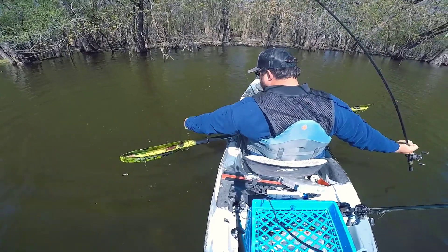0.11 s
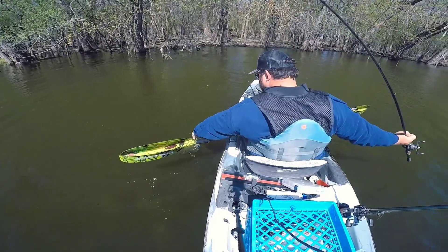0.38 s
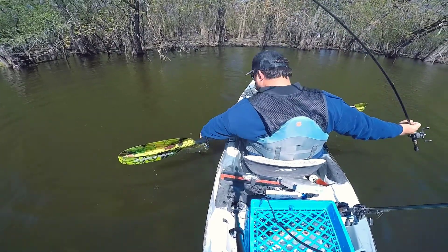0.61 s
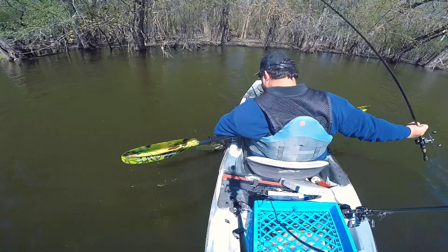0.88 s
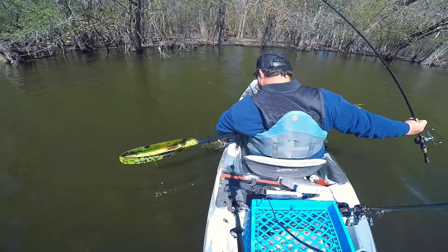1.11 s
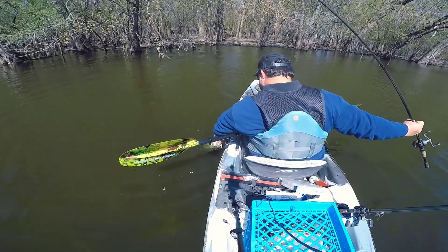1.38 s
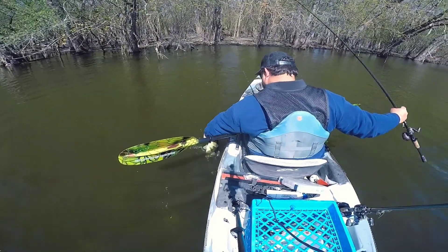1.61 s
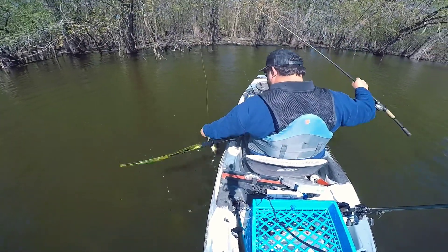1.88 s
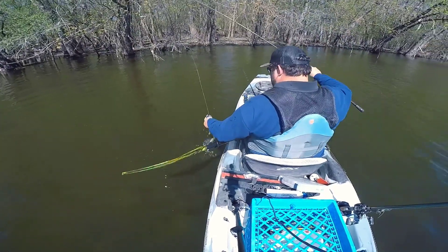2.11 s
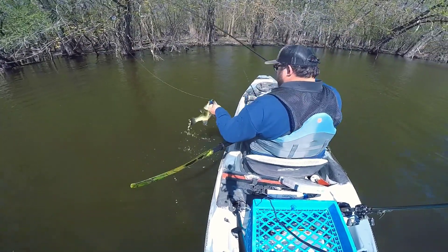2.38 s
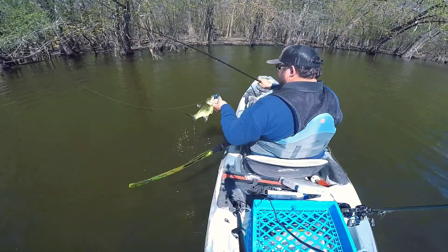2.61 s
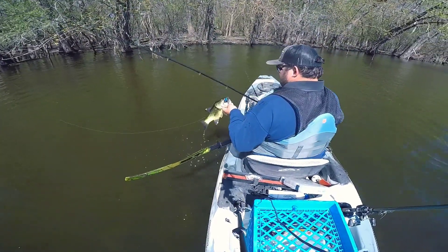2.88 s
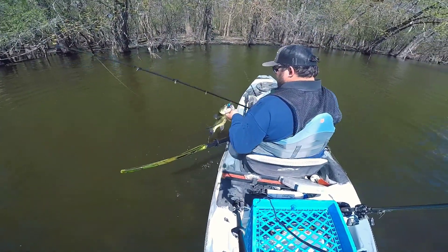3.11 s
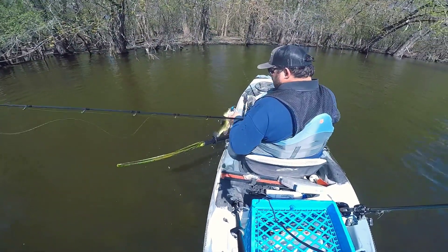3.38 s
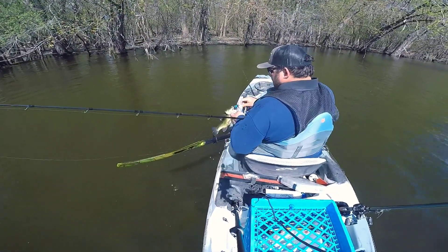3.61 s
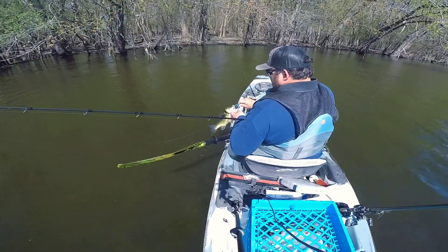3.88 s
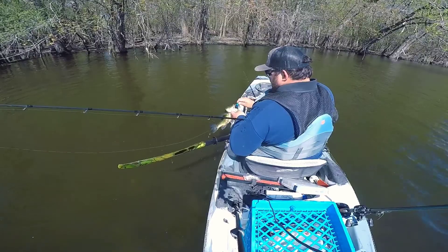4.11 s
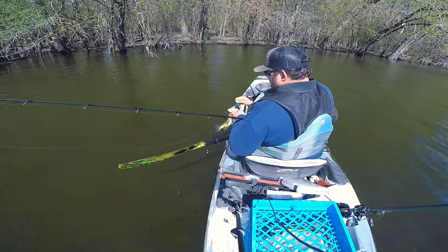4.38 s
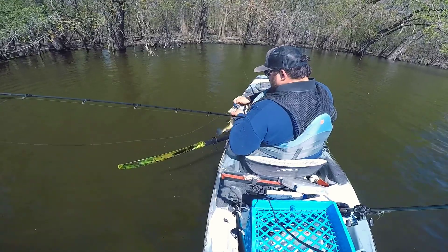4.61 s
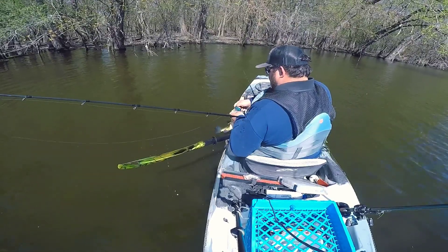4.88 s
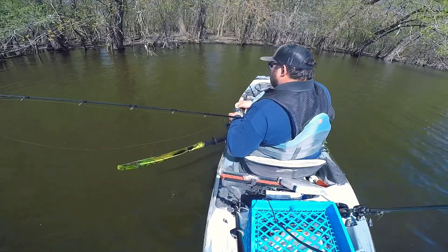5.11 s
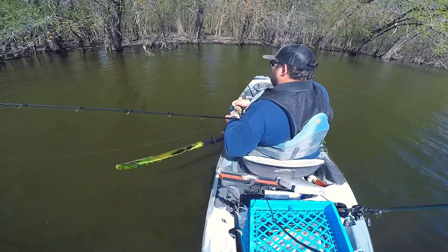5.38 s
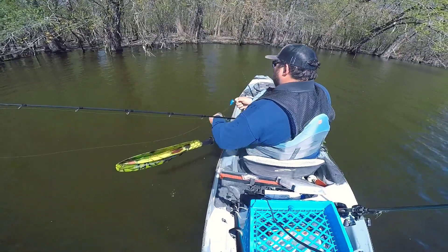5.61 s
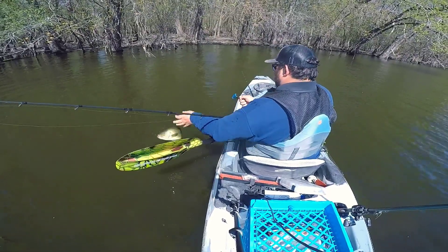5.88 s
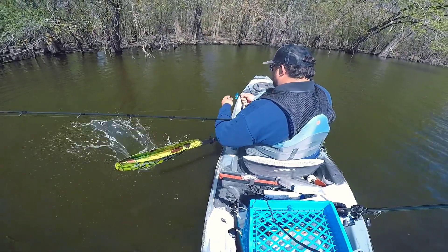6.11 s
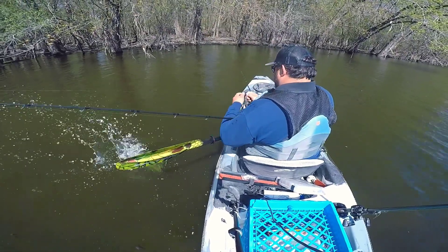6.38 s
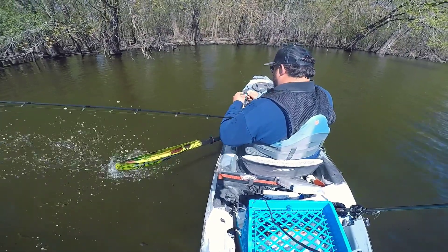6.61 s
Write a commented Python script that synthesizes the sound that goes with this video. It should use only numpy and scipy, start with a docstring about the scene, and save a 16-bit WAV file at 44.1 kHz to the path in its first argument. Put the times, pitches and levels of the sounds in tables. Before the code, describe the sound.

A microphone mounted on a kayak catches deep, irregular wind thumps and faint hiss. After a quiet start, hull bumps and bright drips cluster around two seconds, then a few bubble plops. The reel whirs faintly and ticks as line is pulled. After more sparse ticks, a sudden close splash slaps, gurgles and scatters spray, with droplets falling until the end.

```python
"""Wind gusts thump the microphone over a soft murmur; dull knocks and wet ticks come through.
Blows by rod and paddle ring a plastic kayak hull, drops tick and plop as bubbles, and
a pawl on ratchet teeth makes the reel's drag buzz and click as line is pulled, with a faint gliding tone.
Near the end a small fish goes back with a splash: noise and damped wavelets as slosh and spray."""
import sys
import numpy as np
from scipy import signal
from scipy.fft import rfft, irfft, next_fast_len
from scipy.io import wavfile
from scipy.ndimage import uniform_filter1d, map_coordinates

SR = 44100
rng = np.random.default_rng(int(sys.argv[2]) if len(sys.argv) > 2 else 0)


def boost_factor(decibels):
    """Convert a level in decibels to a linear amplitude factor."""
    exponent = np.asarray(decibels, float) / 20
    return 10 ** exponent


def to_wav(s):
    """Save 16-bit WAV."""
    ch = np.atleast_2d(s).T  # columns
    pcm = np.round(np.clip(ch, -1, 1) * 32767)  # PCM
    wavfile.write(sys.argv[1], SR, pcm.astype(np.int16))


N = 297231  # length in samples

# Levels are relative: later gains and filters still act on them.
# the fish slaps the surface: [start_s, spray_level_db, slosh_level_db, loss_db per 10 ms]
SLAPS = [(5.912, -40.5, -45, 4), (5.95, -42, -70, 3.5), (5.98, -61.5, -44.5, 12.5),
         (6.05, -52.5, -49.5, 0.5), (6.104, -27.5, -32.5, 16), (6.35, -59, -48.5, 4.5),
         (6.44, -49.5, -73, 2.5), (6.5, -48.5, -51, 0.5), (6.699, -59.5, -47, 12)]
SLAP_RISE_DB_PER_S = 898
# thrown water falls back: [time_s, spray_level_db]
FALLING_WATER = [(5.9, -59.5), (6.02, -57), (6.08, -46), (6.13, -56), (6.19, -59), (6.25, -54.5),
                 (6.47, -48.5), (6.58, -70), (6.65, -63.5), (6.74, -56)]
FALLING_SLOSH_DB = -13.5  # slosh against spray as the water falls back
# colour of spray and of stirred droplets: [frequency_hz, level_db]
SPRAY_COLOUR = [(120, -31.5), (200, -17.5), (288, -12), (358, -29), (414, -33.5), (544, 2.5), (1780, -1),
                (1910, -1), (5910, -10.5), (13900, -13), (15500, -12)]

# trapped air pockets with sweeping pitch; the faint rising glide at 3.69 s is the reel speeding up:
# [start_s, length_ms, start_pitch_hz, end_pitch_hz, level_db]
BUBBLES_AND_REEL_GLIDE = [(.543, 5.34, 2915, 2994, -47.5), (1.994, 9.31, 1212, 1251, -56.5),
                          (1.205, 7.555, 1882, 1949, -60), (1.483, 12.534, 574.4, 720, -46),
                          (1.497, 38.03, 518.1, 1050, -54.5), (1.525, 45.62, 533.2, 1450, -55),
                          (1.847, 13.184, 1130, 2200, -43), (3.046, 55.28, 554.6, 1208, -49.5),
                          (3.127, 18.62, 758.6, 1650, -43), (3.209, 9.824, 1896, 2001, -52.5),
                          (3.69, 45, 2690, 4700, -67), (4.785, 6.02, 3240, 2900, -51.5),
                          (5.681, 10.3, 1285, 1320, -58.5), (5.945, 6.59, 2550, 2962, -30),
                          (5.96, 6.95, 701.1, 848, -40), (5.966, 8.494, 515.2, 598.9, -39),
                          (5.977, 11.9, 544, 799.3, -34.5), (6.032, 13.58, 361.9, 419.3, -38.5),
                          (6.044, 13.07, 490.1, 756.4, -40), (6.057, 8.91, 2822, 2950, -35),
                          (6.097, 13.554, 1183, 1149, -27.5), (6.118, 9, 2014, 1940, -36),
                          (5.91, 3.487, 1141, 1265, -32.5), (5.934, 5.35, 1147, 1200, -40.5),
                          (5.996, 10.52, 495.3, 517, -43), (6.039, 15, 1419, 1457, -49),
                          (6.053, 13.29, 421.1, 400.5, -38.5), (6.111, 22.76, 542.7, 539.5, -45.5),
                          (6.192, 29.31, 1005, 698.8, -45.5), (6.225, 29.6, 1651, 1475, -52),
                          (6.344, 5.09, 697.7, 791.3, -50), (6.346, 6.416, 1129, 1177, -43.5),
                          (6.433, 6.975, 966.3, 1114, -43), (6.448, 6.93, 1282, 1398, -44.5),
                          (6.531, 15.47, 550.1, 561.8, -48.5), (6.605, 9, 747, 771, -48),
                          (6.499, 8.845, 1773, 1803, -42.5), (6.703, 43.65, 370.9, 478, -45.5)]
SWEEP_FADE_DB, SWELL_DB_PER_OCTAVE = 10.5, 5.5  # lost over the length; won back per octave of climb

# drops, spray and tackle ticking: [start_s, level_db, pitch_hz, relative width in octaves, t60_ms of the hiss]
TICKS = [(0.544, -48, 4805, 1.486, 6.55), (1.381, -56, 3640, 0.111, 11.45),
         (1.3646, -49.5, 10090, 0.882, 1.574), (1.469, -57.5, 3706, 0.3403, 11.9),
         (1.493, -48.5, 7849, 0.353, 11.42), (1.495, -65, 3100, 0.352, 10), (1.5, -53.5, 2400, 0.657, 13.9),
         (1.503, -42.5, 5495, 1.54, 6.08), (1.506, -56, 3505, 0.376, 9.81),
         (1.5215, -44.5, 1296, 0.659, 13.86), (1.546, -53.5, 2695, 0.471, 13.48),
         (1.522, -43, 3078, 0.1604, 8.95), (1.537, -44.5, 4488, 1.443, 26.87),
         (1.8156, -47, 3970, 0.412, 7.39), (1.8745, -42.5, 5809, 0.169, 6.12),
         (1.895, -47, 11950, 0.473, 5.42), (1.9948, -42, 3370, 0.3484, 16.88),
         (2.071, -39, 1922, 8.69, 10.87), (2.119, -49.5, 1700, 0.502, 8.15),
         (2.156, -50.5, 5275, 0.435, 26.76), (2.164, -50.5, 2900, 0.3013, 14.87),
         (2.18, -57.5, 3000, 0.3007, 15), (2.2234, -47, 10060, 2.042, 3.72),
         (2.232, -50, 3677, 0.3045, 18.9), (2.249, -50, 4190, 0.443, 15.28),
         (2.2744, -33, 9435, 1.134, 13.16), (2.286, -44.5, 2572, 0.579, 5.75),
         (2.315, -55.5, 4125, 0.316, 8.07), (2.324, -60, 13200, 0.299, 5.1), (2.372, -55, 8003, 0.2013, 6),
         (2.396, -49, 10500, 0.995, 3.97), (2.398, -55.5, 3654, 0.243, 7.95),
         (2.421, -45, 5502, 0.398, 9.13), (2.425, -55, 8310, 0.1983, 10.13),
         (2.446, -56.5, 8200, 0.2256, 6), (2.447, -51, 2999, 0.3976, 8.34),
         (2.496, -57, 9000, 0.498, 2.994), (2.3436, -50.5, 4284, 0.604, 6.76),
         (2.354, -48, 4429, 0.492, 2.596), (2.365, -38.5, 12500, 0.545, 4), (2.366, -44, 4023, 0.422, 6.89),
         (2.3762, -49.5, 5576, 0.745, 4.23), (2.4055, -42.5, 7296, 0.788, 2),
         (2.4157, -40.5, 7100, 0.554, 2.205), (2.4505, -46.5, 11010, 0.705, 3),
         (2.4669, -27.5, 8684, 3.003, 5.883), (2.4758, -47, 10460, 0.787, 3),
         (2.487, -41.5, 7829, 0.8, 2.148), (2.864, -43.5, 9585, 0.307, 18.42),
         (2.91, -49.5, 5570, 0.3233, 12.84), (3.0483, -47, 1500, 1.24, 3.3),
         (3.1277, -34, 3140, 1.719, 3.496), (3.171, -49, 6967, 0.598, 9.63),
         (3.208, -52, 3280, 2.14, 23.44), (4.146, -44.5, 10550, 1.995, 2.14),
         (4.3855, -48, 9281, 0.6744, 2.183), (4.6677, -52, 6290, 1.64, 8.16),
         (4.7253, -41.5, 3467, 0.959, 29.93), (4.7316, -41.5, 4642, 4.59, 17.02),
         (4.785, -46.5, 6990, 1.91, 2.515), (4.8211, -53, 8939, 0.224, 7.17),
         (5.015, -43, 8900, 0.1872, 21.14), (5.0174, -46.5, 12660, 0.276, 30.5),
         (5.0176, -50, 6282, 0.4464, 24.94), (5.0264, -50.5, 9190, 0.316, 11.74),
         (5.028, -50.5, 13320, 0.3095, 12), (5.051, -54.5, 12970, 0.1485, 10),
         (5.1198, -56.5, 9207, 0.2926, 25), (5.125, -47, 11470, 0.621, 15), (5.13, -51.5, 13500, 0.298, 15),
         (5.151, -48.5, 12470, 0.732, 12), (5.6105, -51, 5900, 0.49, 6.5), (5.6816, -48, 7766, 0.71, 12.93),
         (5.724, -43, 12930, 1.58, 12), (5.9023, -15.5, 2784, 2.26, 1.736),
         (5.911, -34.5, 8370, 1.193, 11.96), (5.928, -29.5, 2406, 1.013, 12.96),
         (5.939, -25.5, 2617, 0.4794, 7.32), (5.944, -23.5, 8180, 2.172, 3.643),
         (5.948, -20.5, 3014, 0.471, 9.18), (5.96, -30, 2261, 0.2668, 20.78),
         (5.961, -31.5, 4114, 0.423, 12.15), (6.018, -45, 3766, 0.2803, 9.45),
         (6.0302, -30, 5068, 0.9655, 19.56), (6.0578, -34.5, 3996, 0.846, 9.27),
         (6.073, -33, 2700, 0.783, 19.88), (6.076, -38, 1562, 0.186, 14.32),
         (6.091, -31, 3272, 0.65, 18.28), (6.1, -18, 2851, 0.5954, 21.4),
         (6.1082, -15.5, 4275, 0.4617, 2.494), (6.154, -34.5, 1942, 0.459, 29.92),
         (6.19, -40.5, 7968, 0.314, 10.18), (6.247, -43.5, 2791, 0.18, 17.75),
         (6.249, -43.5, 5500, 1.267, 2.88), (6.2818, -34, 6130, 1.3, 3.3), (6.336, -44, 3661, 0.2623, 9.97),
         (6.349, -30, 7015, 0.768, 8.6), (6.389, -35, 3663, 0.269, 6.1), (6.4146, -31.5, 9350, 1.173, 3.75),
         (6.434, -24, 7006, 3.505, 7.13), (6.455, -43, 2472, 0.2062, 12.42),
         (6.486, -41, 3067, 0.2735, 9.8), (6.495, -29, 5636, 0.694, 8.416),
         (6.532, -45.5, 5500, 1.483, 4.005), (6.56, -38.5, 4900, 0.784, 7.94),
         (6.593, -45, 1902, 0.628, 9.96), (6.702, -33, 5975, 0.751, 5.33),
         (6.507, -36.5, 9590, 0.851, 10.7), (6.622, -32.5, 6050, 0.881, 8.87),
         (6.634, -32, 10990, 0.933, 4.71), (6.6898, -36, 4470, 2.13, 10.36), (6.72, -30, 7475, 1.793, 7.43)]

# blows on the hull: [start_s, level_db, brightness_hz, scuff_t60_ms]
KNOCKS = [(0.212, -53.5, 405.4, 150.5), (0.819, -50.5, 334.5, 42.9), (0.866, -54, 405.5, 53),
          (2.061, -37.5, 1877, 75.05), (2.0641, -29, 307.1, 46.05), (2.09, -40.5, 299.1, 89.8),
          (2.125, -47.5, 329.2, 150), (2.208, -46.5, 1303, 54.9), (2.21, -38, 235.7, 38),
          (2.232, -52, 351, 220), (2.298, -54.5, 149.9, 138.8), (2.528, -40, 1412, 50.5),
          (2.897, -47.5, 299.9, 26.87), (2.906, -38, 211.5, 27.86), (2.943, -56.5, 1299, 30),
          (3.258, -58.5, 294.8, 271.4), (3.282, -53, 655.7, 38.7), (4.729, -53, 756, 39.5),
          (6.095, -40.5, 371, 23.76)]
# resonances of the hull: [pitch_hz, width_hz, level_db]
HULL_MODES = [(123.98, 9.002, 9), (177.06, 30.98, 5.5), (253.55, 28.9, -0.5), (341, 33.16, -4),
              (448.8, 47.83, -1), (656.22, 107.1, -7.5), (1050, 129.95, -10.5), (1320, 73.5, -9),
              (1700, 210.2, -14.5), (2200, 238.1, -17.5), (3640, 2068, -22.5)]

# reel spool turning fast: [time_s, click_rate_per_s, level_db]
DRAG_BUZZ = [(3.58, 47, -85), (3.64, 89, -64), (3.7, 230.33, -63), (3.745, 135, -63), (3.77, 40.72, -76.5),
             (3.83, 119.27, -80.5), (3.88, 264, -63.5), (3.985, 240.9, -59.5), (4.02, 168.27, -60),
             (4.043, 126.54, -65.5)]
# spool pulled click by click: [start_s, length_s, first_gap_s, ratio of each gap to the last, level_db]
LINE_PULLS = [(4.0464, .315, 0.012365, 1.0509, -61), (4.412, .29, 0.03, 1.153, -61),
              (5.061, .035, 0.02581, 0.97, -56), (5.157, .055, 0.025, .96, -58.5),
              (5.497, .075, 0.024, 1.015, -55.5), (5.6, .09, 0.03747, 1.05, -55.5)]
CLICK_SCATTER_DB = 3
# resonances of the reel body: [pitch_hz, width_hz, level_db]
REEL_MODES = [(2054.3, 240, -5), (2600, 280, -2), (3139.7, 952, -8), (3794.8, 168.65, -0.5),
              (4495.6, 367.6, -6), (6411, 2500, -20.5), (8900, 480, -16.5)]

# single gusts on the microphone: [peak_s, half_length_s, flutter_level_db, rumble_db relative to flutter]
GUSTS = [(0.227, 0.0587, -47.5, 1), (0.477, 0.1147, -50, -3), (0.72, 0.1199, -30.5, -15),
         (0.985, 0.07916, -28, -19.5), (1.213, 0.09485, -32.5, -15), (1.535, 0.05217, -24.5, -34),
         (1.876, 0.02659, -20.5, -37.5), (2.091, 0.0742, -38.5, -9.5), (2.648, 0.0561, -38.5, -17.5),
         (2.975, 0.04015, -16.5, -28), (3.07, 0.09296, -22, -11), (3.44, 0.09707, -29.5, -11.5),
         (3.747, 0.0974, -32, -10.5), (4.382, 0.1864, -25.5, -17), (4.69, 0.156, -27.5, -15),
         (4.865, 0.0779, -22.5, -21.5), (5.032, 0.18035, -29, -10), (5.265, 0.0426, -19, -7.5),
         (5.567, 0.11885, -24.5, -8), (5.651, 0.06467, -18, -13.5), (5.802, 0.0428, -21, -7.5),
         (5.881, 0.05303, -29, 3), (6.034, 0.1438, -25.5, -5.5), (6.13, 0.02766, -19.5, -15),
         (6.369, 0.03855, -36.5, 3.5), (6.457, 0.02591, -21, -24), (6.59, 0.06437, -24, -10),
         (6.71, 0.03247, -24, -8.5)]
GUST_FALL_DB = 13.5  # lost by the flutter in each half length
LULL_FLUTTER_DB, LULL_RUMBLE_DB = -50.5, -55  # between gusts
# slow heave of the air: [time_s, level_db]
HEAVE = [(0, -24), (.84, -21), (1.9, -23), (2.56, -28), (2.9, -19), (3.55, -17), (4.24, -27), (4.8, -19),
         (6.74, -19)]
# colour of the slow push of the air: [frequency_hz, level_db]
PUSH_COLOUR = [(1, -8), (2.5, 0), (7, 0), (12, -3), (21, -8), (34, -40), (90, -140)]
# colour of the gust flutter: [frequency_hz, level_db]
FLUTTER_COLOUR = [(16, -28), (24, 21.5), (35, 13), (50, -1), (70, -87.5), (150, -120)]
# colour of the gust rumble: [frequency_hz, level_db]
RUMBLE_COLOUR = [(35, -44.5), (50, 4), (70, -7.5), (105, -22.5), (150, -33.5), (220, -88.5), (500, -120)]

# cloth and dripping water stir as the angler moves: [time_s, crackle_level_db]
STIR = [(0, -72), (1.45, -73.5), (1.6, -69), (2.05, -66.5), (2.17, -61.5), (2.47, -68.5), (2.56, -71.5),
        (3.0, -76.5), (3.6, -71), (3.9, -81), (4.3, -69.5), (5.3, -77), (5.62, -71), (5.86, -74.5)]
MURMUR_DB, MURMUR_FOLLOWS = -60, 0.062  # level at a crackle of -75 dB; dB gained per dB of crackle
# colour of murmur and hiss together: [frequency_hz, level_db]
AIR_COLOUR = [(59, -30.5), (100, 2), (140, -4), (330, -9.5), (434, -11), (1920, -23.5), (6760, -29),
              (8700, -27.5), (10500, -26.5), (12400, -27.5), (15000, -36.5)]

# microphone in its housing: [frequency_hz, gain_db]
MIC_RESPONSE = [(7000, -1), (8900, 1), (10000, -5), (11500, -3), (13000, -0.5), (15200, -3), (15900, -32.5)]


def splash():
    """The fish breaks the surface: gurgling slosh below, clumps of falling spray above."""
    s, spray_peak_db, slosh_peak_db, loss_db = np.transpose(SLAPS)
    falling_db, = curves(FALLING_WATER)
    fall = loss_db[:, None] / .01  # dB per s
    spray_db = peaks(s, spray_peak_db, SLAP_RISE_DB_PER_S, fall, falling_db)
    slosh_db = peaks(s, slosh_peak_db, SLAP_RISE_DB_PER_S, fall, falling_db + FALLING_SLOSH_DB)

    noise = patchy(coloured(rng.standard_normal(N), SPRAY_COLOUR), depth_db=4.5)
    low = filtered(noise, lambda hz: 1 / np.sqrt(1 + (hz / 1500) ** 4))
    gurgle = grains(240, hz=720, octaves=0.7457, cycles=9.315, spread_db=0.809, rise=0.0923)
    slosh = 0.4927 * unit(low) + gurgle

    plinks = grains(600, hz=2671.5, octaves=0.6517, cycles=10.017, spread_db=1.1942, rise=0.04508)
    patter = grains(1300, hz=6633.2, octaves=0.7058, cycles=2.639, spread_db=4.0, rise=0.00992)
    spray = 0.95 * unit(noise - low) + 1.0426 * plinks + 0.9656 * patter
    clumps = boost_factor(2.231 * wobble(90) + 1.711 * wobble(32))
    spray = unit(spray * clumps)

    wet = np.arange(N) / SR > FALLING_WATER[0][0]
    return wet * (boost_factor(slosh_db) * unit(slosh) + boost_factor(spray_db) * spray)


def bubbles_and_reel_glide():
    """Trapped air pockets ring, and the reel's glide rises once; each pitch sweeps slowly, then faster."""
    out = np.zeros(N)
    for s, length_ms, start_hz, end_hz, db in BUBBLES_AND_REEL_GLIDE:
        swell_db = SWELL_DB_PER_OCTAVE * np.log2(end_hz / start_hz) - SWEEP_FADE_DB
        u = np.linspace(0, 1, int(length_ms * SR / 1000))  # progress through the sweep
        pitch = start_hz * (end_hz / start_hz) ** (u ** 1.455)
        edges = np.minimum(1, np.minimum(u / 0.05274, (1 - u) / 0.126))
        shiver_db = uniform_filter1d(rng.standard_normal(len(u)), size=140) * 20  # unsteady level
        tone = np.sin(2 * np.pi * np.cumsum(pitch) / SR)
        add(out, s, boost_factor(db + swell_db * u + shiver_db) * edges * tone)
    return out


def ticks():
    """Each tick is a sharp front and a dying hiss within one resonant band."""
    out, t = np.zeros(N), np.arange(1024) / SR
    for s, db, hz, octaves, t60_ms in TICKS:
        burst = rng.standard_normal(len(t)) * boost_factor(-60000 * t / t60_ms)
        burst[0] += 2.4  # the sharp front
        band = modes([(hz, hz * max(octaves, .05) * 1.2023, 0)])
        tick = filtered(burst, lambda f: band(f) ** 3)
        add(out, s - .0002, boost_factor(db - 1.5775) * tick / np.abs(tick).max())
    return out


def knocks():
    """A blow and a short scuff drive the hull; brighter contacts reach its higher modes."""
    out, t = np.zeros(N), np.arange(8192) / SR
    hull = modes(HULL_MODES)
    for s, db, bright_hz, scuff_ms in KNOCKS:
        scuff = boost_factor(-60000 * t / scuff_ms)
        settling = 0.057 * boost_factor(-60 * t / 0.5)  # gear settles after the blow
        force = rng.standard_normal(len(t)) * (scuff + settling)
        force[0] += 30  # the blow itself
        contact = modes([(bright_hz, 0.95 * bright_hz, 0)])
        knock = filtered(force, lambda f: hull(f) * contact(f) / (1 + 1j * f / (5.19 * bright_hz)))
        add(out, s, boost_factor(db + 8.0) * knock / np.abs(knock).max())
    return out


def reel():
    """The pawl snaps over the ratchet teeth and rings the reel body: a buzz at speed, else single clicks."""
    rate, db = curves(DRAG_BUZZ)
    t = np.arange(N) / SR
    turning = (t > DRAG_BUZZ[0][0]) * (t < DRAG_BUZZ[-1][0])
    teeth = np.cumsum(rate * turning * (1 + 0.05 * wobble(90))) / SR  # teeth passed so far
    snaps = np.diff(np.floor(teeth), prepend=0) * boost_factor(db + 0.87 * rng.standard_normal(N))

    for s, length, gap, growth, peak_db in LINE_PULLS:
        after = np.cumsum(np.append(0, gap * growth ** np.arange(16)))  # s since the first click
        sizes = boost_factor(peak_db + CLICK_SCATTER_DB * rng.standard_normal(len(after)))
        kept = after < length
        snaps[((s + after[kept]) * SR).astype(int)] = sizes[kept]

    ringing = signal.fftconvolve(snaps, boost_factor(-60 * t[:600] / 0.021))[:N]
    rattle = 0.05721 * ringing * rng.standard_normal(N)  # the spring rattles after each snap
    clicks = filtered(snaps + rattle, modes(REEL_MODES))
    hull = modes(HULL_MODES)
    drumming = filtered(snaps, lambda f: hull(f) / (1 + 1j * f / 600))  # the hull drums along
    return boost_factor(28.0) * clicks + boost_factor(41.0 + 2.2 * wobble(39)) * drumming


def wind():
    """Eddies of three sizes push the diaphragm; each has its random swells partly evened to follow its level."""
    s, half_s, flutter_peak_db, below_db = np.transpose(GUSTS)
    slope = GUST_FALL_DB / half_s[:, None]  # dB per s
    push_db, = curves(HEAVE)
    flutter_db = peaks(s, flutter_peak_db, slope, slope, LULL_FLUTTER_DB)
    rumble_db = peaks(s, flutter_peak_db + below_db, 0.7681 * slope, 1.051 * slope, LULL_RUMBLE_DB)
    total = 0
    for db, colour, window_s in ((push_db, PUSH_COLOUR, .3), (flutter_db, FLUTTER_COLOUR, .1),
                                 (rumble_db, RUMBLE_COLOUR, .05)):
        eddy = coloured(rng.standard_normal(N), colour)
        power = uniform_filter1d(eddy ** 2, int(window_s * SR))
        power = np.abs(uniform_filter1d(power, int(window_s * SR / 2)))
        total = total + boost_factor(db) * unit(eddy / (power + 0.048) ** 0.39775)
    edge = np.minimum(np.arange(N), np.arange(N)[::-1]) / (.04 * SR)
    return total * np.sin(np.pi / 2 * np.minimum(edge, 1))  # eased in and out, so that no step clicks


def breeze():
    """A soft murmur of water and trees over an even hiss, with cloth and droplets crackling in the treble."""
    rustle_db, = curves(STIR)
    murmur_db = MURMUR_DB + MURMUR_FOLLOWS * (rustle_db + 75)
    air = coloured(rng.standard_normal(N), AIR_COLOUR)
    low = filtered(air, lambda hz: 1 / np.sqrt(1 + (hz / 1900) ** 4))
    murmur = boost_factor(murmur_db + 1.2933 * wobble(16)) * unit(low)
    hiss = boost_factor(-78.5 + 1.2 * wobble(24)) * unit(air - low)
    crackle = grains(900, hz=5987.5, octaves=0.92379, cycles=13.0, spread_db=1.5, rise=0.16)
    fizz = 1.4126 * coloured(rng.standard_normal(N), SPRAY_COLOUR)
    rustle = patchy(crackle + fizz, depth_db=3.5)
    return murmur + hiss + boost_factor(rustle_db) * unit(rustle)


def bank(x):
    """Faint scattered echoes from boat, water and trees: a decaying noise tail."""
    t = np.arange(SR // 4) / SR
    tail = rng.standard_normal(len(t)) * boost_factor(-60 * t / 0.19474)  # t60 in s
    return signal.fftconvolve(x, tail / np.linalg.norm(tail))[:N]


def grains(rate, hz, octaves, cycles, spread_db, rise):
    """Random damped wavelets, rate per second, of scattered pitch and size, rms 1."""
    when, size = rng.random((2, int(rate * N / SR), 1))
    pitch = np.clip(hz * 2 ** (octaves * rng.standard_normal(when.shape)), 250, 15000)
    k = np.arange(400)
    turns = pitch * k / SR
    wave = np.sin(2 * np.pi * turns * (1 + rise * turns / cycles))  # pitch climbs with rise
    wave *= np.exp(-turns * 2 / cycles) * (1 - k / len(k))
    wave *= 1 - np.exp(-turns * 4.77 / cycles)  # a soft start
    wave *= boost_factor(-spread_db * np.log(size + 0.0053))  # many small, a few large
    places = (when * N).astype(int) + k
    return unit(np.bincount(places.ravel(), wave.ravel(), N)[:N])


def patchy(x, depth_db):
    """x with random patches of gain, a few hundred Hz by some tens of ms."""
    z = signal.stft(x, nperseg=256)[2]
    field = uniform_filter1d(rng.standard_normal(z.shape), size=5, axis=0)
    field = uniform_filter1d(field, size=6, axis=1)
    return signal.istft(z * boost_factor(depth_db * unit(field)), nperseg=256)[1][:N]


def peaks(times, levels_db, rise_db_per_s, fall_db_per_s, base_db):
    """Level in dB of a base plus peaks that rise and fall at the given speeds."""
    grid = np.arange(0, N, 32)
    since = grid / SR - np.asarray(times)[:, None]
    lost = np.where(since < 0, -since * rise_db_per_s, since * fall_db_per_s)
    power = (boost_factor(levels_db[:, None] - np.minimum(lost, 100)) ** 2).sum(0)
    return 10 * np.log10(np.interp(np.arange(N), grid, power) + boost_factor(base_db) ** 2)


def modes(table):
    """Causal response of a body with these resonances, their signs alternating."""
    def response(f):
        total = 0
        for k, (centre, width, db) in enumerate(table):
            damping = 1j * f * width
            total = total + (-1) ** k * boost_factor(db) * damping / (centre * centre - f * f + damping)
        return total
    return response


def along(spectrum):
    """Gain at any frequency from (Hz, dB) points."""
    f, db = np.transpose(spectrum)
    return lambda hz: boost_factor(np.interp(np.log(hz + .1), np.log(f), db))


def filtered(x, response):
    """x times a complex response of frequency."""
    n = x.shape[-1]
    m = next_fast_len(2 * n)
    return irfft(rfft(x, m) * response(np.fft.rfftfreq(m, 1 / SR)), m)[..., :n]


def coloured(x, spectrum):
    """x with the colour of (Hz, dB) points, rms 1."""
    return unit(filtered(x, along(spectrum)))


def unit(x):
    """Scaled to rms 1."""
    return x / np.sqrt(np.mean(x ** 2) + 1e-20)


def curves(rows):
    """One value per sample for each column after the time."""
    s, *cols = np.transpose(rows)
    return [np.interp(np.arange(N) / SR, s, c) for c in cols]


def wobble(rate):
    """A smooth random curve, rate knots a second."""
    knots = rng.standard_normal(int(N * rate / SR) + 4)
    return map_coordinates(knots, [np.arange(N) * rate / SR])


def add(track, s, sound):
    """Mixes a sound in at time s."""
    part = track[round(s * SR):][:len(sound)]
    part += sound[:len(part)]


def scene():
    """Everything at one microphone; only the near sounds send echoes back."""
    near = splash() + bubbles_and_reel_glide() + ticks() + knocks() + reel()
    return (near + boost_factor(-15.0) * bank(near) + wind() + breeze())[None]


def roll_off(x):
    """The treble ends steeply here."""
    return signal.sosfilt(signal.butter(12, 16380, fs=SR, output="sos"), x)


def record(dry):
    """The microphone housing colours the treble."""
    longer = np.pad(dry, ((0, 0), (4096, 4096)), "reflect")  # keeps the filter clear of the ends
    heard = filtered(longer, along(MIC_RESPONSE))[:, 4096:-4096]
    return roll_off(heard)


dry = scene()
out = record(dry)
to_wav(out)
```